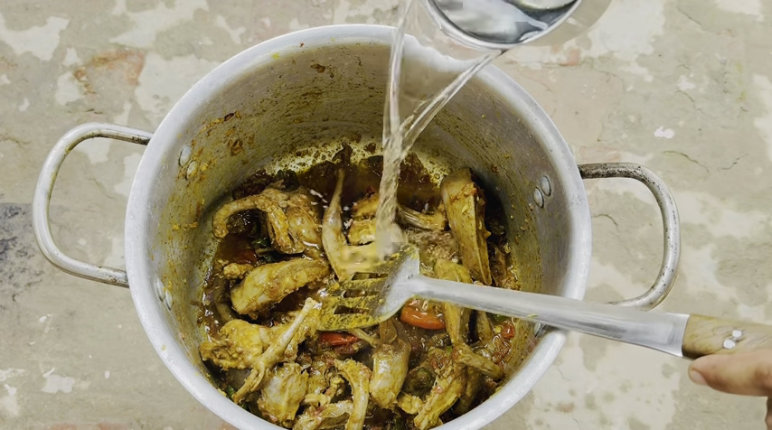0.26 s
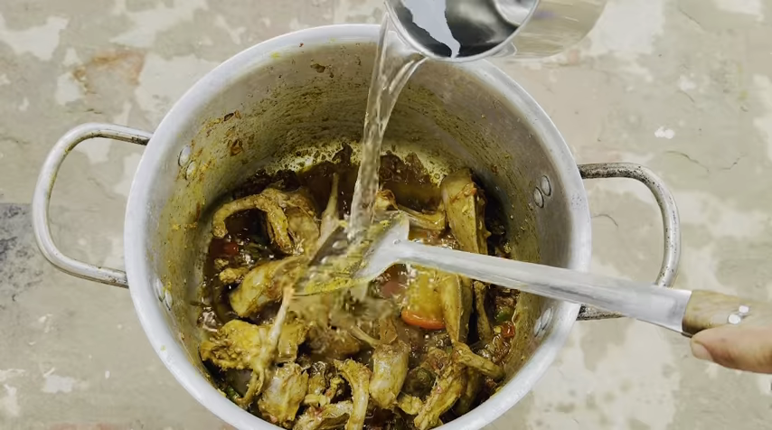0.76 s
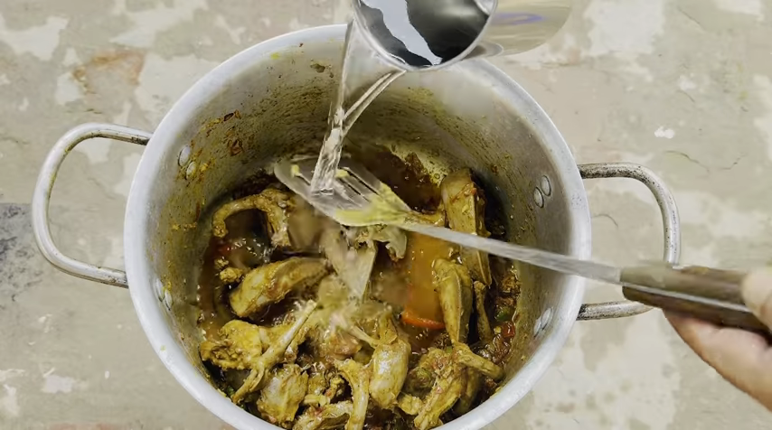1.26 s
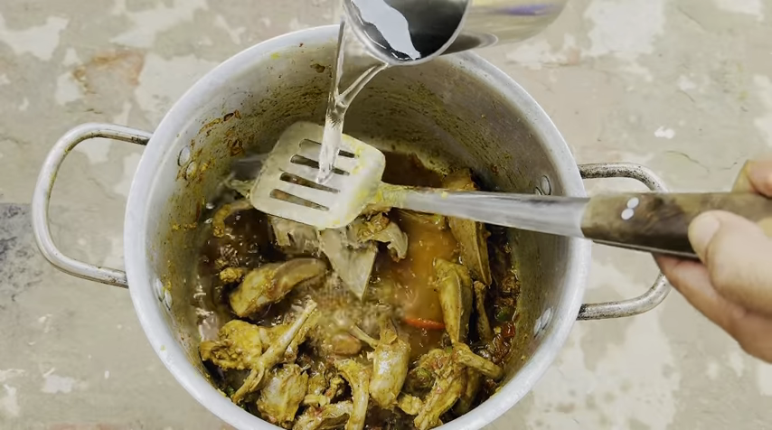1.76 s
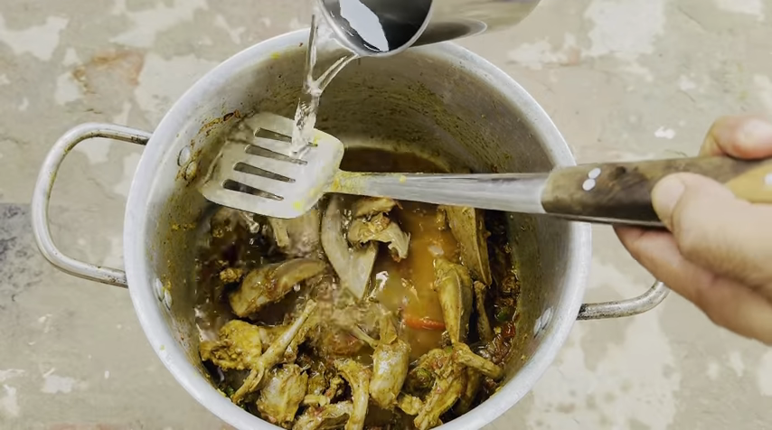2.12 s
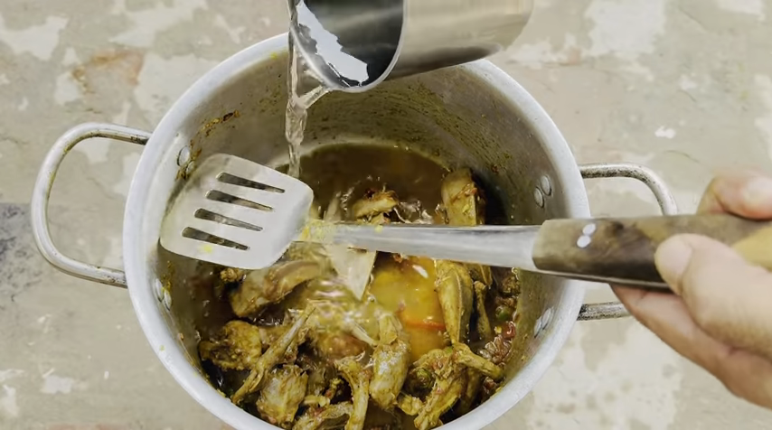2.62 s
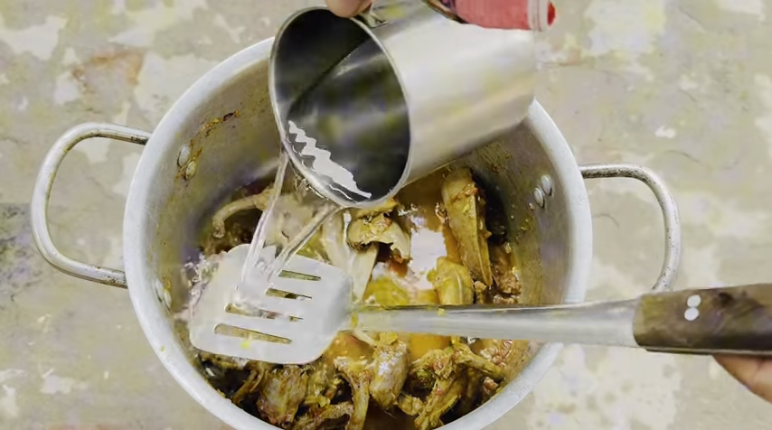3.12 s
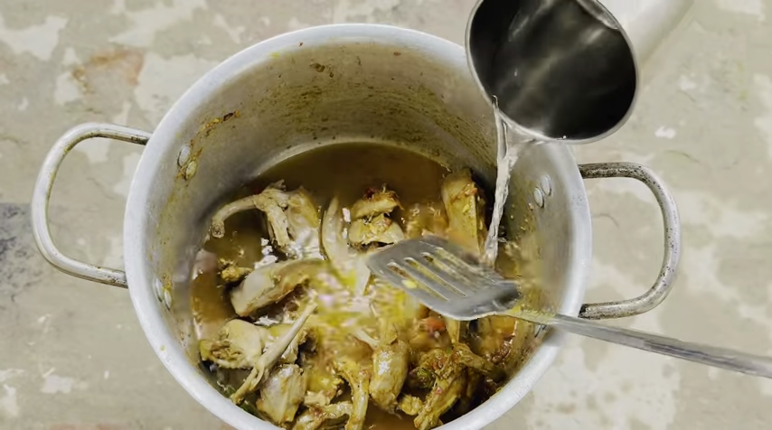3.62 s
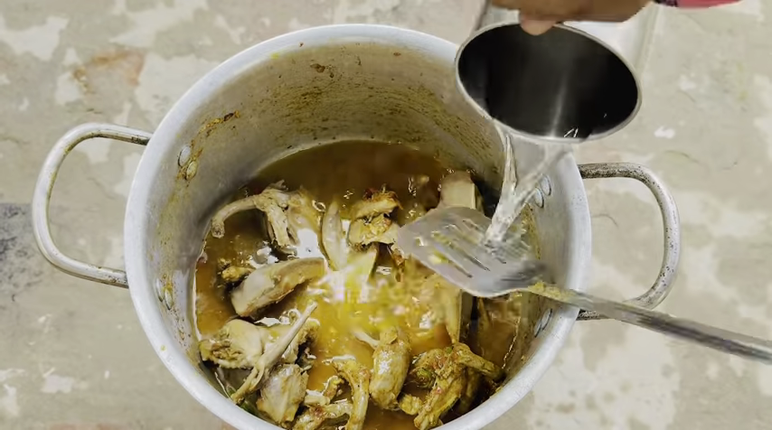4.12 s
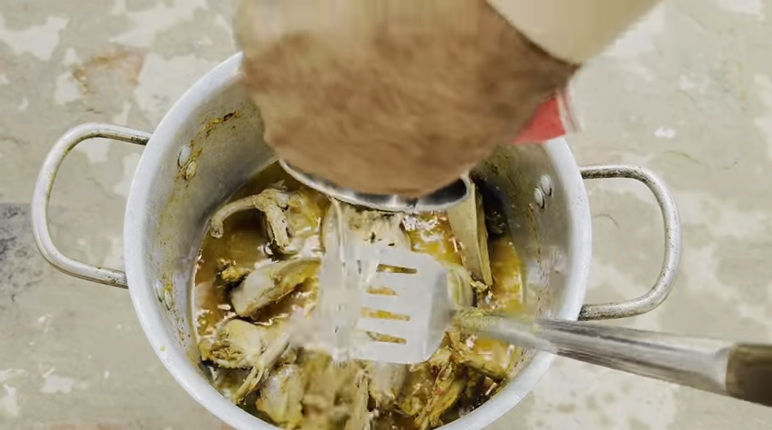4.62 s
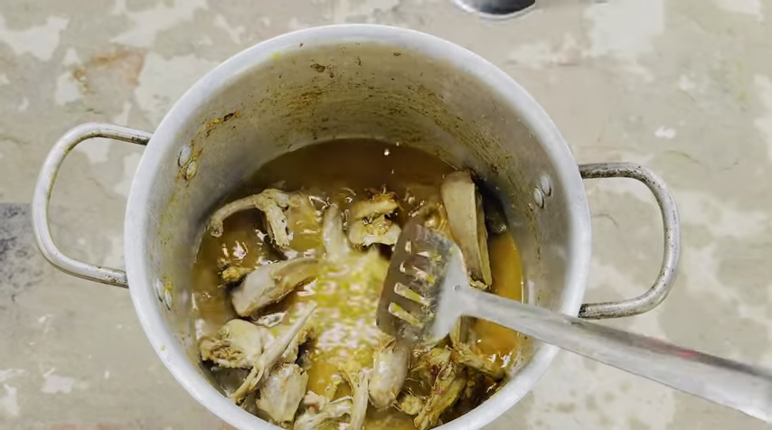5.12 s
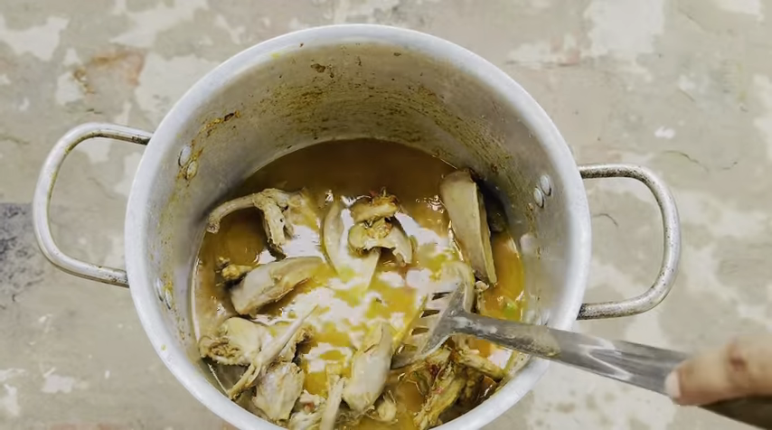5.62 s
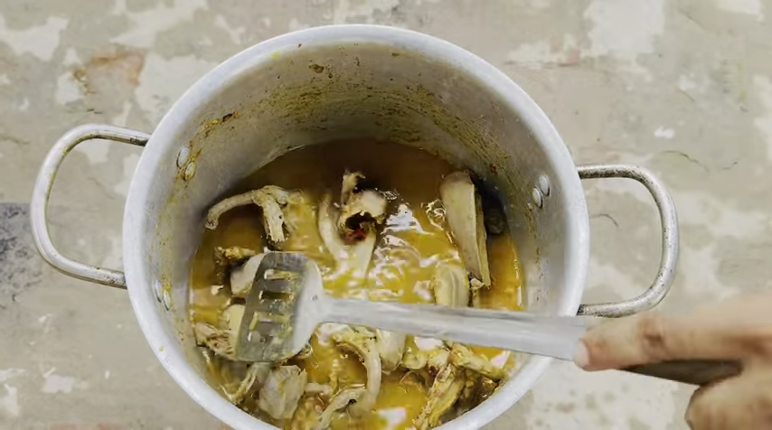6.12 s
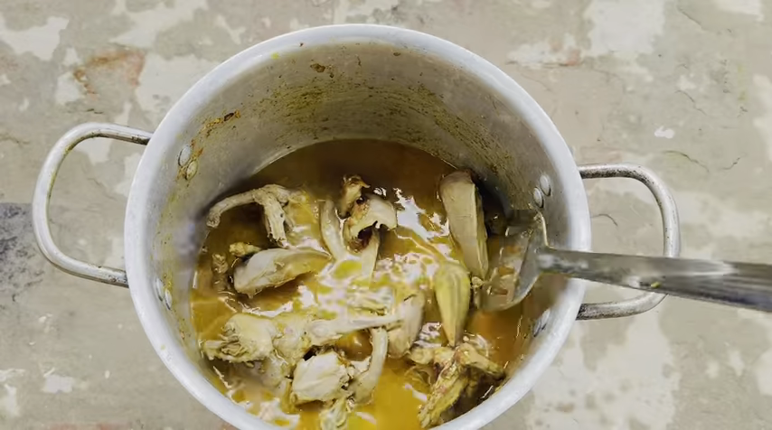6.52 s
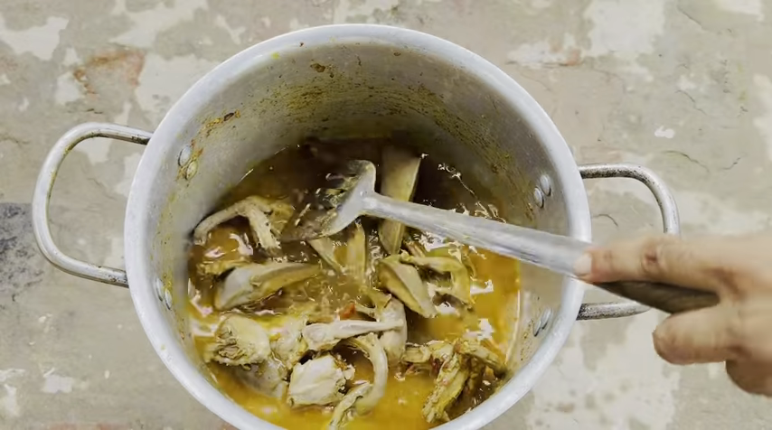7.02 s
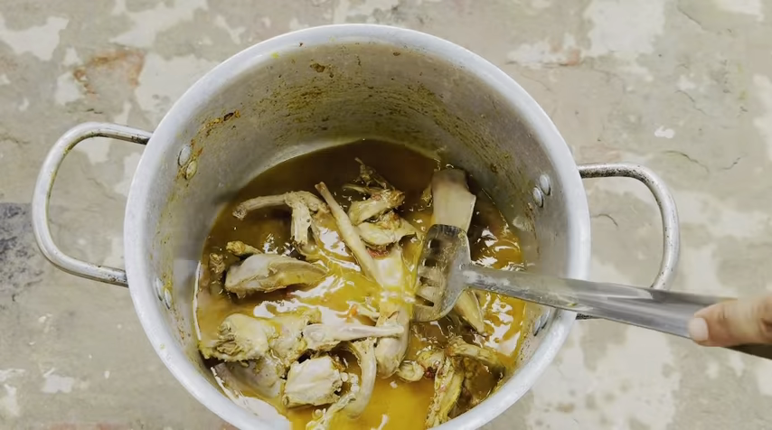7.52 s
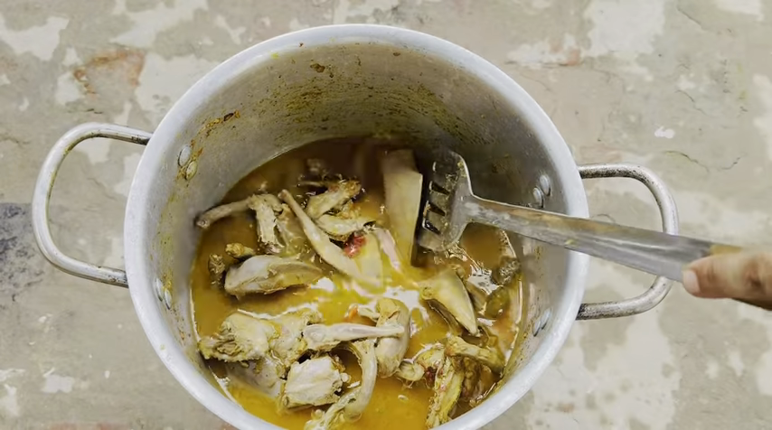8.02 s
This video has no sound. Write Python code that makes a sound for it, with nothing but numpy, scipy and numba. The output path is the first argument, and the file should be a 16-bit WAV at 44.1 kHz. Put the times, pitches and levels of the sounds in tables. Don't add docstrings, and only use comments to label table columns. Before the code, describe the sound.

Close stereo microphones hear a small splashy stream hit a metal blade and drip into hot stew, with sharp crackling drops and bubbly plops over a steady low burner roar. Sizzle dies within a second. Dull metallic knocks come mid-pour. After a final drumming gush, a hollow mug thump sounds, followed by soft sloshing, wet smacks and a spatula knock, in a small dry space.

```python
import sys
import numpy as np
from scipy import signal
from scipy.fft import rfft, irfft
from scipy.io import wavfile
from scipy.ndimage import uniform_filter1d
from numba import njit

SR = 44100
rng = np.random.default_rng(int(sys.argv[2]) if len(sys.argv) > 2 else 0)


def transcribe(u):
    v = np.clip(np.atleast_2d(u).T, -1, 1)
    q = np.round(v * 32767).astype(np.int16)
    wavfile.write(sys.argv[1], SR, q)


def voltage_ratio(level):
    return 10 ** (np.asarray(level, float) / 20)


N = 364266
HZ = np.arange(N // 2 + 1) * SR / N
POUR_STARTS_S, POUR_ENDS_S = 0.2, 5.2
SWELL_CYCLES, STRIKE_CYCLES = 1.28, 0.35


def unit(x):
    return x / np.sqrt(np.mean(x ** 2))


def noise():
    return rng.standard_normal(N)


def over_hz(hz, values):
    return np.interp(np.log(HZ + 1), np.log(hz), values)


def band(x, lo_hz, hi_hz):
    return signal.sosfilt(signal.butter(2, [lo_hz, hi_hz], "band", fs=SR, output="sos"), x)


def walk(rate):
    k = int(SR / rate)
    held = np.repeat(rng.standard_normal(N // k + 1), k)
    return unit(uniform_filter1d(held, k)[:N])


@njit
def rings(start_s, hz, t60, size, glide, rise=STRIKE_CYCLES):
    out = np.zeros(N)
    for s, f, t, a, g in zip(start_s, hz, t60, size, glide):
        first, length, phase, closed = int(s * SR), t * SR, 0., 1.
        fade, opening = np.exp(-np.log(1000) / length), np.exp(-f / (rise * SR))
        for i in range(min(int(length), N - first)):
            out[first + i] += a * (1 - closed) ** 2 * np.sin(phase)
            phase += 2 * np.pi * f * (1 + g * i / length) / SR
            a *= fade
            closed *= opening
    return out


def cluster(s, length, hz, db, t60, scatter, count, rise=STRIKE_CYCLES):
    u = rng.random((len(s), count, 4))
    u[:, 0, :3] = 0, .5, 1
    start_s = s[:, None] + length[:, None] * u[..., 0]
    pitch = np.minimum(hz[:, None] * np.exp(scatter * (u[..., 1] - .5)), .4 * SR)
    decay = t60[:, None] * (.5 + u[..., 3])
    size = voltage_ratio(db)[:, None] * u[..., 2] ** 2
    glide = 0.18 * u[..., 3]
    return rings(start_s.ravel(), pitch.ravel(), decay.ravel(), size.ravel(), glide.ravel(), rise)


def bursts(start_s, db, t60):
    kicks = np.zeros(N)
    np.add.at(kicks, (np.asarray(start_s) * SR).astype(int), voltage_ratio(db))
    return signal.lfilter([1], [1, -np.exp(-np.log(1000) / (t60 * SR))], kicks) * noise()


# (frequency [Hz], level [dB per Hz])
ROAR_SPECTRUM = [(20, -33), (40, -5), (60, 5), (130, -4.5), (260, -1), (420, -13), (520, -13),
                 (1000, -15.5), (1400, -25), (2500, -29), (5000, -25.5), (8000, -25.5), (11000, -30),
                 (15700, -31)]
# (frequency [Hz], width [Hz], gain [dB])
CAVITIES = [(118, 41, 7.5), (240.6, 15.5, 8), (372.3, 127, 12), (877.5, 86, 9.5), (4380, 85, 10.5),
            (6120, 67, 10), (6600, 180, 13.5), (7150, 96, 12), (10270, 750, 9)]
# (time [s], strength [dB])
FLAME_SURGES = [(0.0, -60), (0.18, -58), (0.48, -53), (1.86, -43.5), (2.02, -43), (2.64, -46.5),
                (3.06, -48), (3.4, -42.5), (4.69, -45.5), (5.2, -41.5), (5.77, -47.5), (7.5, -44),
                (7.89, -48), (8.26, -43)]
# (level at the usual strength [dB], share of the surge [1])
BASS_PARTS = [
    (-54.5, 0.13),
    (-44, 0.65),
    (-45, 0.17),
]


def burner():
    colour = voltage_ratio(over_hz(*np.transpose(ROAR_SPECTRUM)))
    for centre_hz, width_hz, peak_db in CAVITIES:
        colour = colour * voltage_ratio(peak_db / (1 + (2 * (HZ - centre_hz) / width_hz) ** 2))
    spectrum = rfft(noise()) * colour
    below = [1 / (1 + (HZ / edge_hz) ** 8) for edge_hz in (85, 200, 500)]
    roar = voltage_ratio(-43.5 + 1.55 * walk(30)) * unit(irfft(spectrum * (1 - below[-1]), N))
    t = np.arange(N) / SR
    surge_db = np.interp(t, *np.transpose(FLAME_SURGES)) + 47
    breeze_db = 7 / (1 + np.exp((t - 1.8) / 0.047))
    for (db, share), upper, lower, lift_db in zip(BASS_PARTS, below, [0] + below, (breeze_db, 0, 0)):
        roar += voltage_ratio(db + share * surge_db + lift_db) * unit(irfft(spectrum * (upper - lower), N))
    return roar


# (time [s], level [dB], air column resonance [Hz])
STEAM_COURSE = [
    (0, -37, 395),
    (.3, -39, 394.5),
    (.55, -41, 374),
    (.8, -43, 335.5),
    (1.1, -78, 314),
]
# (frequency [Hz], level [dB per Hz])
STEAM_SPECTRUM = [(700, -24), (1500, -3.5), (2100, -12), (2800, -0.5), (3600, -9.5), (5000, -7),
                  (6500, -5.5), (8000, -12), (15000, -18)]


def steam():
    s, db, column_hz = np.transpose(STEAM_COURSE)
    t = np.arange(N) / SR
    hiss = unit(irfft(rfft(noise()) * voltage_ratio(over_hz(*np.transpose(STEAM_SPECTRUM))), N))
    wobble = unit(band(noise(), 2.0, 29))
    column = wobble * np.sin(2 * np.pi * np.cumsum(np.interp(t, s, column_hz)) / SR)
    return voltage_ratio(np.interp(t, s, db) - 60 * (t > s[-1])) * (hiss + voltage_ratio(-4.0) * column)


def droplets(rate, lo_hz, hi_hz, cycles, spread_db, hiss_db):
    u = rng.random((int(rate * N / SR), 4))
    start_s = u[:, 0] * N / SR
    pouring = (start_s > POUR_STARTS_S) & (start_s < POUR_ENDS_S)
    u, start_s = u[pouring], start_s[pouring]
    hz = lo_hz * (hi_hz / lo_hz) ** u[:, 1]
    size = voltage_ratio(-spread_db * np.log(u[:, 2] + 1 / 40))
    swarm = rings(start_s, hz, cycles * (0.4 + u[:, 3]) / hz, size, 0.17 * u[:, 3], SWELL_CYCLES)
    hiss = band(noise(), lo_hz, hi_hz)
    return unit((unit(swarm) + voltage_ratio(hiss_db) * unit(hiss)) * voltage_ratio(3.04 * walk(25)))


# (time [s], agitation [dB], fineness of the break-up [dB])
FLOW = [(0.0, -37, -12.5), (0.55, -44, 3), (1.01, -42, 1), (2.23, -46, -1), (3.15, -49, -2),
        (3.45, -46.5, -0.5), (3.7, -58.5, 10), (3.93, -46.5, -0.5), (4.21, -44, -2), (4.44, -45.5, 1),
        (4.52, -41.5, -2.5), (4.74, -40.5, 1.5), (5.08, -50, 6), (6.53, -40, 4), (7.45, -51, 4),
        (7.75, -43, 5), (8.26, -58, -1)]
# (time [s], length [s], centre frequency [Hz], level [dB])
BUBBLE_CLUSTERS = [(0.247, 0.058, 2860, -20), (0.476, 0.07, 3340, -23), (0.658, 0.038, 3320, -23.5),
                   (.56, 0.096, 3800, -24), (0.723, 0.075, 3430, -31), (.87, 0.051, 5200, -26),
                   (1.054, 0.045, 5400, -47), (1.188, 0.072, 3580, -30), (2.027, 0.091, 3140, -27),
                   (2.128, 0.044, 2800, -28), (2.802, .04, 1950, -33), (2.845, 0.064, 3270, -29),
                   (3.21, 0.066, 2970, -29), (3.664, 0.073, 3520, -31), (4.047, 0.068, 2920, -25.5),
                   (4.2, 0.028, 3400, -30), (4.528, 0.091, 2270, -27), (4.598, 0.061, 1930, -37),
                   (4.684, 0.086, 1890, -34), (4.833, 0.047, 3020, -34), (6.232, 0.054, 1310, -36.5),
                   (6.7, 0.043, 1810, -39), (6.751, 0.03, 3100, -39), (6.7, 0.056, 5200, -30),
                   (1.17, 0.035, 2050, -33), (1.983, 0.027, 2600, -37), (1.19, 0.048, 3220, -35),
                   (4.54, 0.072, 5800, -24), (0.672, .04, 5000, -26), (4.432, 0.022, 1210, -38),
                   (4.68, 0.044, 6000, -38)]
# (frequency [Hz], width [Hz], level [dB])
GUSH_BANDS = [(1690, 240, -3), (2550, 420, -3), (2840, 200, -4.5), (4400, 1100, -10)]


def stream():
    t = np.arange(N) / SR
    s, agitation_db, fineness_db = np.transpose(FLOW)
    fine_db = np.interp(t, s, fineness_db)
    flow_db = np.interp(t, s, agitation_db) + 1.86 * walk(14)
    spray_db = -2 + fine_db - 20 * np.clip((t - POUR_ENDS_S) / 0.59 + 1, 0, 1)
    gurgle = voltage_ratio(flow_db - 11.5 - fine_db) * droplets(1500, 1545, 3380, 26, 3.9, hiss_db=-9)
    spatter = voltage_ratio(flow_db - 6) * droplets(2200, 3440, 8500, 24, 4.4, hiss_db=-9)
    spray = voltage_ratio(flow_db + spray_db) * droplets(900, 8100, 15700, 25, 8.8, hiss_db=-1.4)
    s, length, hz, db = np.transpose(BUBBLE_CLUSTERS)
    sloshes = cluster(s - length / 2, length, hz, db, 24 / hz, 1.3, count=90, rise=SWELL_CYCLES)
    sheet = np.zeros(N)
    for centre_hz, width_hz, level_db in GUSH_BANDS:
        tone = unit(band(noise(), centre_hz - width_hz / 2, centre_hz + width_hz / 2))
        sheet += voltage_ratio(level_db + 2.3 * walk(60)) * tone
    gush_s, gush_length_s, gush_db = 4.53, 0.056, -41
    gush = voltage_ratio(gush_db) * np.exp(-((t - gush_s) / gush_length_s) ** 4) * sheet
    return gurgle + spatter + spray + sloshes + gush


# (time [s], peak [dB], bubble frequency [Hz], snap [dB])
HOT_DROPS = [(0.2200, -5.5, 5470, -27), (.452, -16, 5790, -20), (.512, -19.5, 5560, -18),
             (0.5484, -20, 4660, -23), (0.5858, -14.5, 4640, -10), (1.059, -21, 8850, -8),
             (1.0855, -22, 5390, -21), (1.161, -32, 2000, 1), (1.2265, -20, 5230, -9),
             (1.327, -23, 5580, -17), (1.35, -8, 9560, -42), (1.712, -11.5, 5220, -33),
             (1.7605, -17, 5870, -21), (2.0112, -20.5, 6500, -12), (2.1123, -21.5, 4300, -10),
             (2.3897, -30.5, 1210, 1.5), (2.7181, -16, 7440, -20), (2.9224, -22, 6200, -20),
             (2.9706, -41, 6460, 3), (3.038, -20, 6630, -12.5), (3.17, -22, 5300, -14.5),
             (3.471, -19, 5870, -35), (3.5597, -21, 8300, -32), (3.5879, -19, 6230, -15),
             (3.647, -13, 5270, -19.5), (4.0971, -19.5, 6200, -14.5), (4.168, -18, 7940, -4.5),
             (4.8036, -23, 6670, -7.5), (4.8935, -33, 6800, 1.5), (4.9138, -32.5, 7200, -0.5),
             (1.9128, -27, 5800, -11), (2.33, -29, 3770, -25), (2.442, -15, 5760, -23),
             (3.642, -26.5, 7500, -5), (4.129, -29, 3050, -25), (4.273, -35, 4910, -25),
             (4.9, -33, 5340, -25), (4.484, -34, 5200, -18)]
# (time [s], peak [dB], bubble frequency [Hz], snap [dB])
STIR_TICKS = [
    (5.781, -28.5, 1690, -26),
    (5.862, -30.5, 3680, -6.5),
    (5.921, -29, 4060, -30),
    (6.2304, -31.5, 1570, -7.5),
    (6.649, -24, 6600, -15),
    (6.754, -34.5, 2820, -3),
    (7.0144, -30.5, 1190, -22),
    (7.0286, -26, 3550, -11),
    (7.05, -32, 1580, -6),
    (7.891, -32, 1530, -9),
]
# (time [s], peak [dB], bubble frequency [Hz])
FAT_DROPS = [(0.4894, -16, 2780), (0.5615, -21, 3380), (0.6407, -22, 2920), (1.001, -21.5, 2860),
             (1.3737, -27.5, 2850), (1.669, -27, 2340), (1.819, -25.5, 2550), (2.006, -36, 1270),
             (2.52, -32, 1370), (2.5498, -25, 2690), (2.732, -28, 1780), (2.894, -24.5, 2210),
             (3.188, -17.5, 2550), (3.239, -25.5, 3640), (3.535, -27, 1580), (3.677, -26, 1910),
             (4.0577, -20, 2920), (4.295, -24, 2900), (4.473, -22, 2670), (4.672, -21.5, 1680),
             (4.697, -27, 1050), (4.8374, -23.5, 2460), (.479, -21.5, 4050), (0.798, -27.5, 2320),
             (1.21, -28.5, 2980), (2.7955, -26, 3520), (2.829, -21, 3290), (3.406, -28, 4470),
             (3.755, -36, 1500), (4.071, -23, 3100), (4.308, -29, 2120), (3.547, -29, 2970),
             (1.345, -23, 2900), (1.716, -32, 1290), (3.636, -29, 3270)]
# (time [s], peak [dB], bubble frequency [Hz])
SMALL_DROPS = [(0.4399, -23, 5630), (0.61, -28, 3330), (0.7657, -32, 5490), (0.822, -21, 8250),
               (0.855, -22, 6090), (0.8797, -25, 3060), (0.9315, -28, 3470), (1.13, -25, 7250),
               (1.2161, -24, 6350), (1.4197, -30, 2740), (1.4354, -25, 5750), (1.4571, -18.5, 8200),
               (1.493, -32, 7250), (1.5519, -34, 7080), (1.59, -22, 7840), (1.6174, -30, 4040),
               (1.7, -23, 5440), (1.8766, -29, 6050), (2.0533, -25, 6400), (2.093, -23, 7340),
               (2.2039, -26, 6560), (2.224, -20.5, 7350), (2.2468, -26, 6500), (2.2832, -25, 7000),
               (2.567, -25, 5760), (2.6093, -34, 6650), (2.694, -25, 6340), (2.8634, -27, 2450),
               (3.2452, -27, 2380), (3.267, -26, 5170), (3.3028, -23.5, 6780), (3.4046, -27, 6330),
               (3.449, -27.5, 2980), (3.545, -20, 7600), (3.6234, -33, 5350), (3.8772, -24.5, 4040),
               (3.9988, -26, 4700), (4.0155, -22, 3040), (4.1044, -23, 4900), (4.2418, -31, 6500),
               (4.3261, -24, 5040), (4.3929, -24, 5070), (4.4498, -40, 2830), (4.6079, -25.5, 1980),
               (4.8154, -22, 6040), (4.8705, -24, 4730), (4.9482, -24, 6500), (4.981, -30.5, 2850),
               (5.0044, -34.5, 1660), (5.0613, -30, 4270), (5.1014, -30, 7200)]
# (time [s], peak [dB], bubble frequency [Hz])
MORE_DROPS = [(.489, -22, 6600), (0.831, -32, 2300), (.9794, -29, 7200), (1.0914, -28, 7500),
              (1.164, -18, 3500), (1.252, -36, 1310), (1.3624, -27, 6970), (1.3744, -26, 6200),
              (2.8424, -29, 9500), (2.8716, -29, 6800), (2.9354, -31, 3320), (3.0454, -30, 7100),
              (3.231, -20, 6940), (3.583, -28, 8000), (3.6514, -23, 9050), (4.4014, -26, 7200),
              (4.4233, -37, 1410), (4.5554, -22, 6200), (4.659, -27, 7420), (4.6737, -24, 6240),
              (4.6855, -29, 8900), (6.7074, -35, 990), (6.7894, -34, 9000), (2.816, -22, 9400),
              (1.206, -27, 9800), (.643, -23, 4300), (4.699, -28, 6000), (2.094, -31, 2100),
              (2.222, -32, 2370), (1.328, -27, 4900)]
# (time [s], peak [dB])
FLAT_SLAPS = [(1.0005, -39), (2.7935, -26), (2.8949, -26), (3.188, -26.5), (3.362, -35.5), (6.7527, -27),
              (6.962, -41), (7.013, -24), (0.562, -30.5), (3.636, -34), (2.732, -32)]


def drops():
    events = list(HOT_DROPS) + list(STIR_TICKS)
    events += [(s, db, hz, -19) for s, db, hz in FAT_DROPS]
    events += [(s, db - 0.5, hz, -20) for s, db, hz in SMALL_DROPS]
    events += [(s, db, hz, -19) for s, db, hz in MORE_DROPS]
    s, db, hz, snap_db = np.transpose(events)
    bubbles = cluster(s, 0.0065 + 0 * s, hz, db - 6.5, 0.0038 + 40 / hz, 0.314, count=5, rise=SWELL_CYCLES)
    snaps = band(band(bursts(s, db + snap_db + 14.5, 0.011), 6000, 16000), 5200, 17000)
    slap_s, slap_db = np.transpose(FLAT_SLAPS)
    slaps = band(band(bursts(slap_s, slap_db + 9.0, 0.0077), 820, 4900), 670, 5200)
    pops = rings(s, hz, 14 / hz, voltage_ratio(db - 4.7), 0.32 + 0 * s, SWELL_CYCLES)
    splashes = band(bursts(s, db - 18, 0.033), 2100, 9100)
    crackle = cluster(s, .004 + 0 * s, hz, db + 1.5, 11 / hz, 0.8, count=8, rise=SWELL_CYCLES)
    return bubbles + snaps + slaps + pops + splashes + crackle


# (time [s], frequency [Hz], level [dB], t60 [s])
BIG_BUBBLES = [(.553, 352, -27.5, 0.16), (.632, 66, -25, 0.13), (1.68, 58, -25, 0.14),
               (2.009, 64, -26, 0.15), (4.628, 895, -26, 0.049), (5.079, 148, -25, 0.12),
               (5.824, 964, -31.5, 0.057), (6.24, 394, -25.5, 0.072), (2.001, 1270, -30, 0.072),
               (2.519, 1360, -33.5, 0.073), (2.549, 2720, -29, 0.034), (1.207, 3100, -33, 0.058)]


def bloops():
    s, hz, db, t60 = np.transpose(BIG_BUBBLES)
    return rings(s, hz, t60, voltage_ratio(db), 0.098 + 0 * s, 0.55)


# (frequency [Hz], t60 [s], level struck at spots 0, 1, 2, 3 [dB])
WALL_MODES = [(305, 0.58, -38, -41, -31.5, -54), (476, 0.097, -20.5, -24, -26.5, -34),
              (607, 0.23, -33.5, -31.5, -27, -42), (895, 0.12, -20, -43, -39, -44),
              (997, 0.54, -52, -43, -52, -30), (1220, 0.28, -36, -32.5, -44, -43),
              (1650, 0.35, -34, -35, -32, -31), (1780, 0.14, -20, -29, -24.5, -33),
              (2050, 0.19, -27.5, -32, -44, -25.5), (2294, 0.21, -31, -34.5, -36, -51),
              (2724, 0.1, -27.5, -17.5, -18, -28), (2800, 0.19, -28, -19.5, -50, -44),
              (2970, 0.15, -45, -42, -49, -31), (3110, 0.23, -34, -33, -32, -37)]
# (frequency [Hz], t60 [s], level struck at spots 0, 1, 2, 3 [dB])
BLADE_MODES = [(3520, 0.05, -32, -23, -17, -20), (3990, 0.061, -39, -30, -25, -28),
               (4900, 0.049, -26, -23.5, -40, -22), (5370, 0.073, -45, -29, -33, -25),
               (5790, 0.16, -39, -42, -30, -42), (6200, 0.012, -33, -47, -19, -10.5),
               (6840, 0.14, -49, -35, -51, -34), (7500, 0.055, -45, -47, -46, -29),
               (8150, 0.044, -55, -45, -48, -23)]
# (time [s], strength [dB], scrape [dB], share of the free ring time [1])
WALL_KNOCKS = [
    (1.925, -2, -19, 0.74),
    (2.3464, -0.5, -19.5, 0.67),
    (2.4459, -5, -21, 0.77),
    (2.794, -5.5, -31, 0.45),
    (4.1391, -1, -20.5, 0.5),
    (7.8147, -1, -22, 0.74),
]
KNOCK_SPOTS = [(0, 0), (1, 1), (0, 1), (0, 2), (2, 2), (3, 3)]
# (delay [s], level [dB])
REBOUNDS = [(.009, -3), (.012, -6), (0.015, -4), (.006, -2), (.006, -4), (.016, -10)]


def spatula():
    hz, t60, *spot_db = np.transpose(list(WALL_MODES) + list(BLADE_MODES))
    s, db, scrape_db, free = np.transpose(WALL_KNOCKS)
    roll = 3.4
    out = band(bursts(s, scrape_db + 5.0, 0.022) + bursts(s + 0.003, scrape_db, 0.046), 1700, 9300)
    out += band(bursts(s + 0.025, scrape_db - 14.0, 0.094), 1150, 2800)
    out += cluster(s, .008 + 0 * s, 2300 + 0 * s, scrape_db - 10.5, 0.077 * free, 2.2, count=60, rise=roll)
    for t, strength_db, share, spot, (delay_s, bounce_db) in zip(s, db, free, KNOCK_SPOTS, REBOUNDS):
        u = rng.random((len(hz), 5))
        late = t + 2.2 / hz
        size = voltage_ratio(strength_db + 1.0 + np.mean([spot_db[k] for k in spot], axis=0))
        still = 0 * hz
        out += rings(late, hz * (1 + 0.0028 * (u[:, 1] - .5)), share * t60, 1.21 * size, still, roll)
        rebound_s = late + delay_s + .002 * u[:, 0]
        rebound_hz = hz * (1 + 0.028 * (u[:, 4] - .5))
        out += rings(rebound_s, rebound_hz, 0.3 * share * t60, voltage_ratio(bounce_db) * size, still)
        twin_t60 = np.minimum(.5 * share * t60, .07)
        out += rings(late, hz * (1 + 0.0084 + 0.039 * u[:, 2]), twin_t60, 0.27 * size, still, roll)
        low_twin_hz = hz * (1 - .01 - 0.034 * u[:, 3])
        out += rings(late + 0.0045 * u[:, 4], low_twin_hz, twin_t60, 0.7 * size, still)
    one = np.ones(1)
    squeak = rings(5.862 * one, 5790 * one, .4 * one, voltage_ratio(-41 * one), 0 * one, 10.0)
    return out * voltage_ratio(1.7 * walk(120)) + squeak


# (frequency [Hz], level [dB], t60 [s])
MUG_MODES = [(254, -16, 0.21), (305, -19, 0.53), (319, 4.5, 0.039), (363, -15.5, 0.072), (419, -17, 0.13),
             (480, -14, 0.13), (580, -21, 0.061), (772, -26, 0.082), (870, -9.5, 0.085), (1203, -5, 0.009),
             (1740, -25.5, 0.043), (2600, -21.5, 0.018), (2720, -38, 0.1), (3800, -49, 0.062),
             (4550, -57, .1)]


def mug():
    down_s = 5.6468
    hz, db, t60 = np.transpose(MUG_MODES)
    late = down_s + 0.00283 * np.minimum(500 / hz, 1)
    thud = band(band(rings(late, hz, t60, voltage_ratio(db + 2.0), 0 * hz, .05), 310, 12000), 300, 14000)
    tick = band(bursts([down_s], [-12], 0.0098), 700, 11000)
    tail = band(bursts([down_s], [-16], 0.14), 1000, 9400)
    tail += band(bursts([down_s + 0.0028], [-20], 0.18), 250, 1100)
    boom = band(bursts([down_s + 0.022], [-20], 1.0), 260, 540)
    one = np.ones(1)
    shiver = cluster(down_s * one, .03 * one, 390 * one, -31 * one, 0.233 * one, 0.97, count=50, rise=1.5)
    return thud + tick + tail + boom + shiver


def kitchen(x, t60=0.25, wet_db=-14):
    t = np.arange(int(.5 * SR)) / SR
    echoes = band(rng.standard_normal(len(t)), 300, 8900) * np.exp(-np.log(1000) * t / t60) * (t > .002)
    return x + voltage_ratio(wet_db) * signal.fftconvolve(x, echoes / np.sqrt(np.sum(echoes ** 2)))[:N]


# (frequency [Hz], phase lead of the right [rad], right minus left [dB], unshared part [dB])
PORT_DIFFERENCES = [(200, 0, 0, -45), (400, -.06, 1.1, -21), (900, -.2, 1.9, -15), (1500, -.05, .2, -20),
                    (4500, 0, 0, -22), (6000, .4, 0, -16), (8000, 1.6, 0, -8), (10000, 2.5, 0, -11),
                    (11900, 3.14, 0, -26), (13000, 3.35, 0, -18), (14000, 4, 0, -8), (15700, 4.7, 0, -7)]


def ports(x):
    hz, lead, tilt_db, apart_db = np.transpose(PORT_DIFFERENCES)
    half = voltage_ratio(over_hz(hz, tilt_db) / 2) * np.exp(.5j * over_hz(hz, lead))
    scatter = rng.standard_normal(6000) * np.exp(-np.arange(6000) / 1500)
    scattered = signal.fftconvolve(x, scatter / np.sqrt(np.sum(scatter ** 2)))[:N]
    scattered = rfft(scattered) * voltage_ratio(over_hz(hz, apart_db))
    direct = rfft(x)
    return irfft([(direct + scattered) / half, (direct - scattered) * half], N)


def scene():
    echoing = kitchen(drops() + spatula() + mug())
    draught = voltage_ratio(-68) * unit(band(noise(), 30, 200)) * np.array([[1], [-1]])
    return ports(burner() + steam() + stream() + bloops() + echoing) + draught


TOP_HZ = 15750


def gate_faint(x, lo_hz, hi_hz, pour_hi_hz, jump_db):
    bins = 24
    hz, t, z = signal.stft(x, SR, nperseg=1024)
    drift = np.repeat(rng.standard_normal((z.shape[1] // 4 + 1, 2)), 4, axis=0)[:z.shape[1]].T
    edges = np.exp(0.035 * drift)
    hi_hz = np.where(t < POUR_ENDS_S, pour_hi_hz, hi_hz)
    faint = (hz[:, None] > lo_hz * edges[0]) & (hz[:, None] < hi_hz * edges[1])
    for inside, db in ((faint, jump_db), (hz[:, None] > TOP_HZ, 15)):
        size = uniform_filter1d(np.abs(z), size=bins, axis=0)[::bins]
        quiet = size < voltage_ratio(db) * signal.medfilt2d(size, (1, 41))
        z = z * ~(inside & np.repeat(quiet, bins, axis=0)[:len(hz)])
    return signal.istft(z, SR, nperseg=1024)[1][:N]


def top_cut(x):
    return signal.sosfilt(signal.butter(12, 17020, fs=SR, output="sos"), x)


def record(dry):
    dry = np.tanh(0.77 * dry) / 0.87
    dry = irfft(rfft(dry) * np.where(HZ > TOP_HZ, voltage_ratio(-33), 1), N)
    mid = gate_faint((dry[0] + dry[1]) / 2, 10600, 14000, 13500, jump_db=6.5)
    side = gate_faint((dry[0] - dry[1]) / 2, 1430, 6260, 7360, jump_db=9.5)
    return top_cut(np.array([mid + side, mid - side]))


dry = scene()
out = record(dry)
transcribe(out)
```